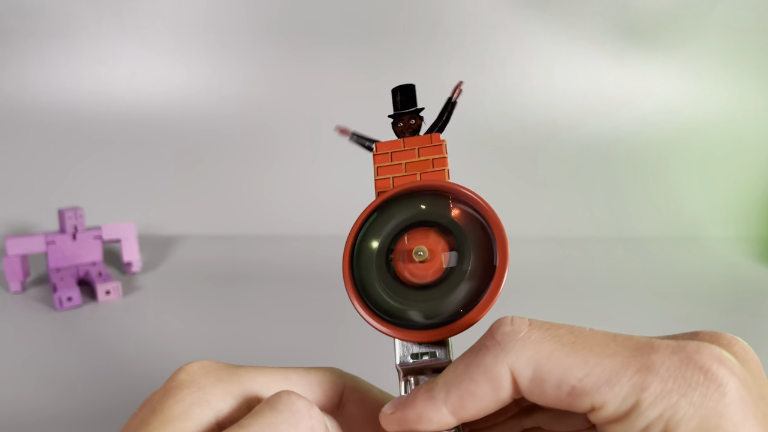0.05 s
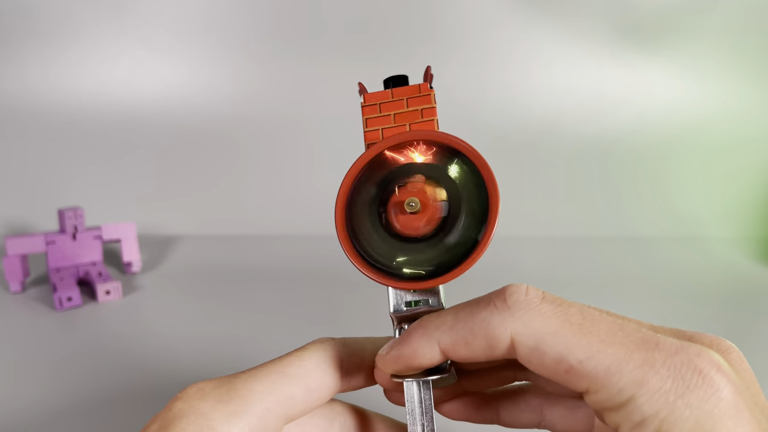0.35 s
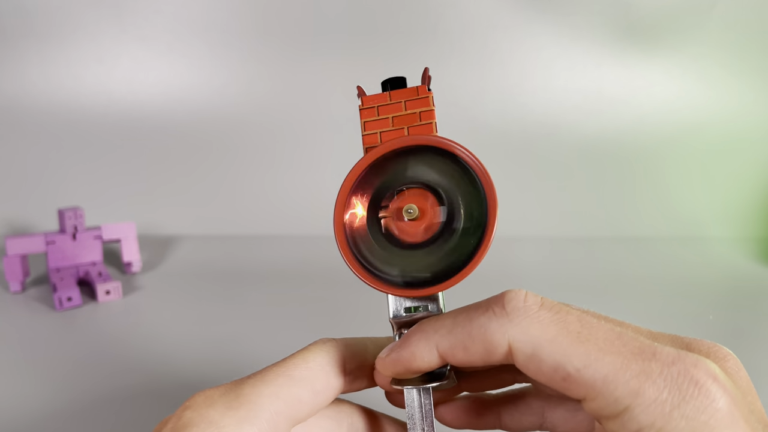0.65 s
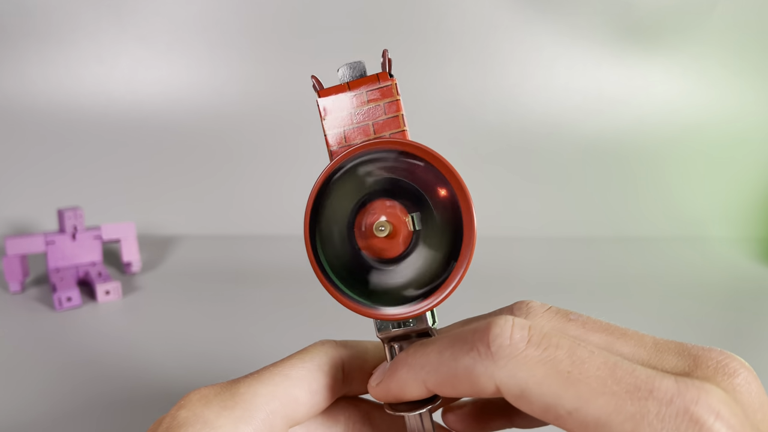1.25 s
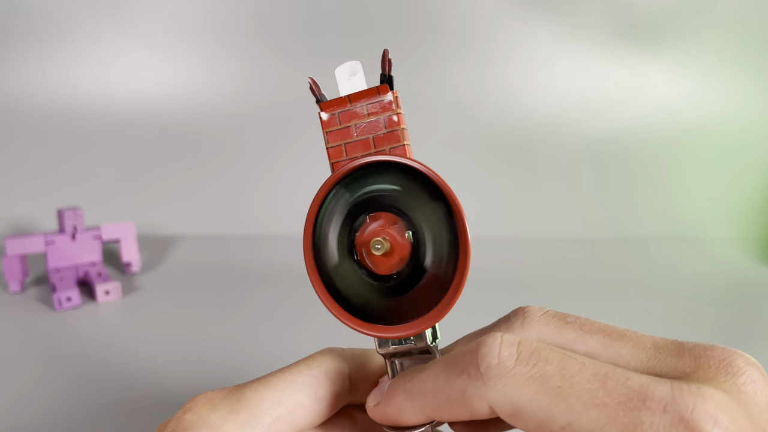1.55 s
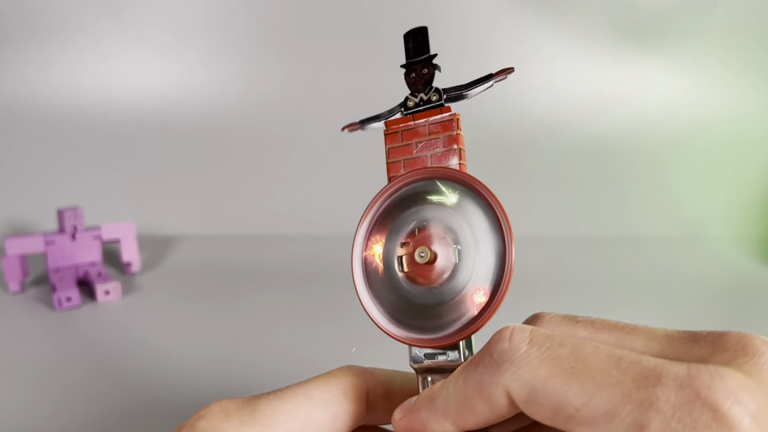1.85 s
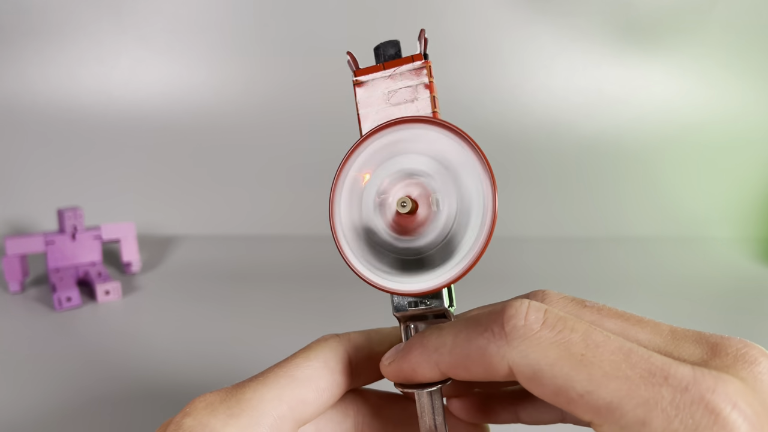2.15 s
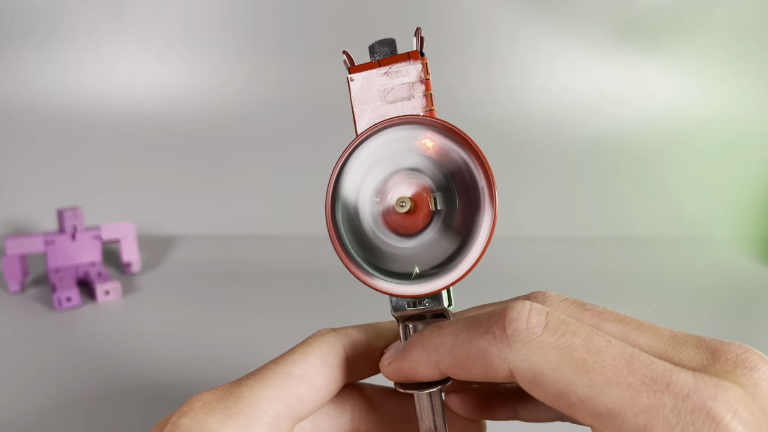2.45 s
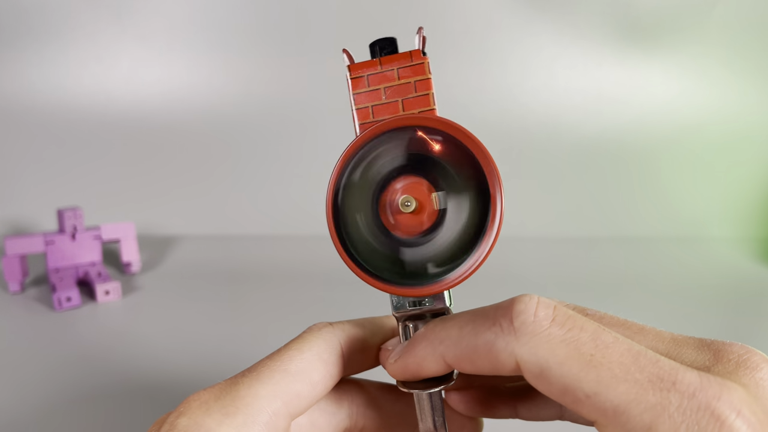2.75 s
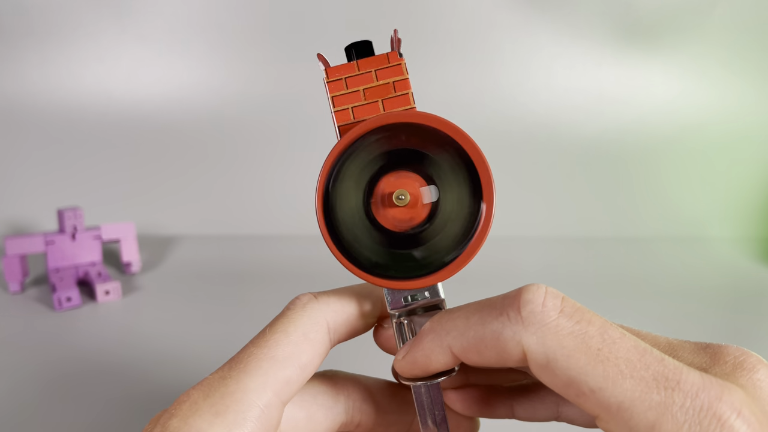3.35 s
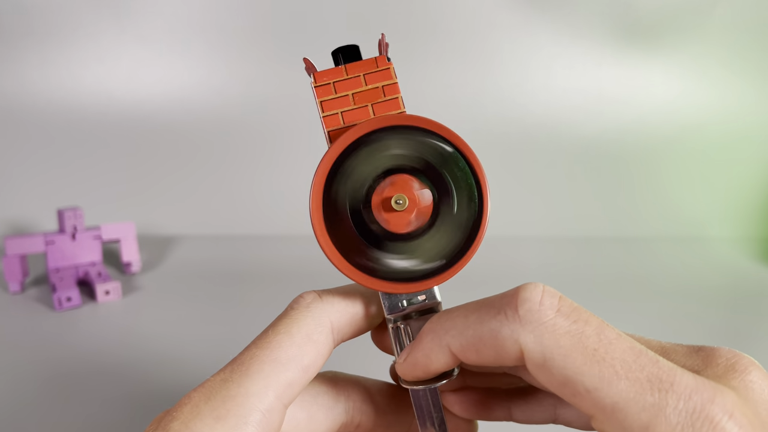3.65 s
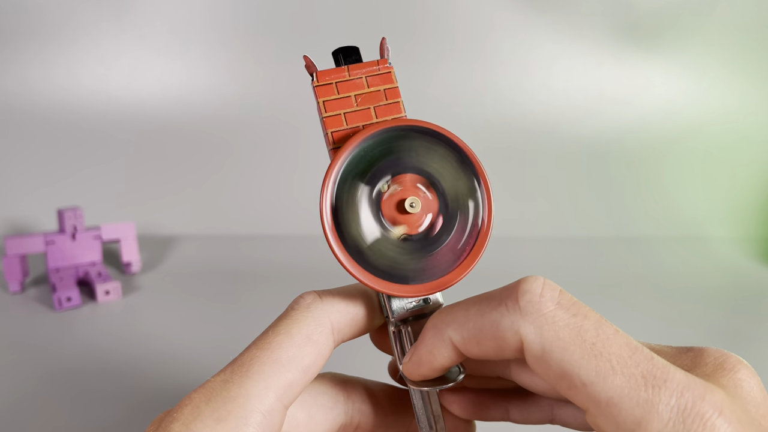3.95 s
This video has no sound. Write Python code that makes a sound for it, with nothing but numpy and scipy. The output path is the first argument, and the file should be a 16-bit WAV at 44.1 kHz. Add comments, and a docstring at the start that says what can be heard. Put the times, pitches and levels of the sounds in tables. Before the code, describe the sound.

Scratchy metallic chatter of a spinning spark wheel toy, pushed twice and left to coast.

```python
"""A tin spark-wheel toy

The toy, close to the microphones, is pumped twice and coasts down after each push.
Its loose gear teeth chatter ever slower, a flint grinds on the gritty wheel, and both ring the tin shell.
Each push adds a low rasp, a brief axle squeal and a faint rumble of the hand; the room is quiet."""
import sys
import numpy as np
from scipy import signal
from scipy.fft import rfft, irfft, next_fast_len
from scipy.io import wavfile
from scipy.ndimage import uniform_filter1d, map_coordinates

SR = 44100
rng = np.random.default_rng(int(sys.argv[2]) if len(sys.argv) > 2 else 0)


def unload_audio(sound):
    """Save the sound as a 16-bit wav file, at the path given as the first command line argument."""
    columns = np.transpose(np.atleast_2d(sound))
    # keep every value between -1 and 1, then stretch to whole-number steps
    steps = np.round(np.clip(columns, -1, 1) * 32767)
    wavfile.write(sys.argv[1], SR, steps.astype(np.int16))


N = 176400
TIME = np.arange(N) / SR
CRUISE_HZ = 100  # teeth per second while the wheel coasts

# teeth that catch hard and stand out of the chatter (time [s], relative level [dB])
CATCHES = [(0.0268, -12.5), (0.0414, -16), (0.1204, -10), (0.2606, -10.5), (0.2842, -15.5), (0.3578, -17),
           (0.4275, -17), (0.4632, -15.5), (0.5788, -15), (0.6115, -15.5), (0.6378, -17.5), (0.7245, -18.5),
           (0.7567, -17.5), (0.7859, -23), (0.8856, -21), (0.898, -18.5), (0.9305, -18.5), (0.9508, -18),
           (0.9851, -23), (1.005, -16.5), (1.0336, -20), (1.0584, -17.0), (1.0732, -18), (1.1336, -19),
           (1.1485, -19.0), (1.174, -24), (1.2055, -23.5), (1.2224, -22.5), (1.2345, -21), (1.2649, -20.5),
           (1.2904, -20.5), (1.3116, -22.0), (1.3396, -19.5), (1.356, -20), (1.3662, -19), (1.3865, -18.5),
           (1.4794, -15.5), (1.4981, -18.5), (1.5724, -18.5), (1.5818, -20), (1.5947, -17.5),
           (1.6399, -11.5), (1.6657, -12.5), (1.7263, -9.5), (1.8195, -9.5), (2.1787, -20), (2.2815, -17),
           (2.3174, -16.5), (2.3445, -19), (2.411, -18), (2.5354, -20.5), (2.5641, -18.5), (2.6521, -21),
           (2.6594, -20), (2.7977, -19.5), (2.808, -16.5), (2.8608, -25), (2.8712, -19), (2.9299, -21.5),
           (2.964, -20), (3.0576, -22), (3.109, -23), (3.1895, -19.5), (3.2285, -21), (3.3687, -20.0),
           (3.4345, -26), (3.501, -23.5), (3.5203, -28.5), (3.5339, -26), (3.5518, -25.5), (3.5778, -24.0),
           (3.5994, -26), (3.6141, -25), (3.632, -22.5), (3.6534, -21.0), (3.7347, -23.5), (3.766, -25.5),
           (3.8501, -26), (3.8891, -30), (3.9058, -28.5), (3.9378, -27.5), (3.9789, -19)]


def toy():
    """Teeth and flint strike the metal as the wheel speeds up and slows down."""
    # how fast the wheel turns (time [s], speed [teeth per second])
    wheel_speed = [(0, 202), (.12, 233), (.25, 129), (.55, 101), (.85, 104), (1.25, 76), (1.5, 72.6),
                   (1.62, 128), (1.78, 233), (2.0, 138), (2.45, 114.5), (2.85, 92.5), (3.5, 77.7), (4, 51)]
    # how loud the toy is (time [s], relative treble level [dB], relative middle level [dB])
    loudness = [(0, -20.5, -28), (.1, -21, -28.5), (.16, -27, -33.5), (.26, -24, -31), (.38, -28.5, -35),
                (.68, -26.5, -34), (.98, -30, -37), (1.22, -31.5, -38.5), (1.37, -30.5, -37),
                (1.58, -29.5, -38), (1.67, -24.5, -30.5), (1.81, -19.5, -30), (1.9, -25.5, -35),
                (2.2, -28, -34), (2.52, -32.5, -38), (2.65, -31, -35.5), (3.12, -35, -39), (3.25, -29, -36),
                (3.32, -36, -38), (3.48, -37.5, -42), (3.67, -35.5, -38), (3.93, -36.5, -42)]
    speed, = curves(wheel_speed)
    treble_db, middle_db = curves(loudness)
    grit = amp(-7 + 3.5 * np.log2(speed / CRUISE_HZ)) ** 2  # more flint at higher speed
    contact = (teeth(speed) + grit * flint(speed)) / (1 + grit)
    contact = 16 * np.tanh(contact / 16)  # softly limit the ordinary hits
    contact += catches(speed, treble_db)
    slow = smooth(contact, seconds=.0048)  # the shell's low notes answer slowly
    return (clicks(contact, treble_db, middle_db) + ringing(contact, slow, middle_db)
            + scraping(slow, middle_db) + pushes(slow))


def teeth(speed):
    """Each passing tooth hits and bounces once; a gap is left where a tooth catches."""
    passed = np.cumsum(speed) / SR
    count = int(passed[-1])
    jitter, strength, delay, bounce = rng.standard_normal((1000, 4))[:count].T
    place = np.arange(count) + .5 + .055 * jitter  # counted in teeth
    caught = np.interp(np.transpose(CATCHES)[0], TIME, passed)
    free = np.abs(place[:, None] - caught).min(axis=1) > .65
    times = np.interp(place, passed, TIME)
    db = 1.8 * strength
    length = drag_time(times, speed)
    bounce_times = times + 2 * length * np.exp(delay / np.pi)
    bounce_db = db - 5 + 2 * bounce

    def strike(which):
        hit = bursts(times[which], db[which], length[which])
        return hit + bursts(bounce_times[which], bounce_db[which], length[which] / 2)

    passing = strike(free)
    return passing / running_mean(passing + strike(~free))


def catches(speed, chatter_db):
    """Some teeth catch hard: short bursts of energy above the chatter."""
    times, db = np.transpose(CATCHES)
    over_db = db - 2.7 - np.interp(times, TIME, chatter_db)
    return bursts(times, over_db, .85 * drag_time(times, speed))


def drag_time(times, speed):
    """Seconds of contact: a tooth drags on the slow wheel and snaps past on the fast one."""
    return .001 * (CRUISE_HZ / np.interp(times, TIME, speed)) ** .9


def flint(speed, grains_per_s=1400):
    """Grit passes under the flint, denser as the wheel speeds up."""
    chance, strength = rng.random(N), rng.standard_normal(N)
    at = np.flatnonzero(chance < grains_per_s * speed / CRUISE_HZ / SR)
    energy = bursts(at / SR, 5 * strength[at], length_s=.0001, size=60)
    return energy / running_mean(energy)


def clicks(contact, treble_db, middle_db):
    """Each hit makes a bright edge, a short ping of the wheel and a fuller body."""
    # tone of the bright edge (frequency [Hz], level [dB])
    edge_tone = [(3000, -60), (6000, -26), (8000, -11), (8550, -8), (9400, -3), (10100, -1.5), (11200, 0),
                 (12200, -3), (12750, -2.5), (13200, -15), (14000, -26), (14600, -32), (15400, -29),
                 (16000, -40)]
    # the wheel's own notes (frequency [Hz], width [Hz], level [dB])
    ping_notes = [(8930, 240, 0), (11130, 300, -10)]
    # tone of the body (frequency [Hz], level [dB])
    body_tone = [(100, -53), (480, -64), (680, -28), (1050, -39), (1600, -49), (2400, -6.5), (3500, -32.5),
                 (4400, -1.5), (5600, 5), (6400, 4.5), (7800, 4.5), (9500, 5.5), (13000, -33)]
    edge = noise(contact * shifting(3.5) * amp(treble_db + 2) ** 2, edge_tone)
    ping = noise(contact * shifting(3) * amp(treble_db - 4) ** 2, modes(ping_notes))
    body = noise(contact * shifting(4) * amp(middle_db - 1.5) ** 2, body_tone)
    return edge + ping + body


def ringing(contact, slow, middle_db):
    """The hits ring the tin shell, the wheel's rim and the housing."""
    # high notes of the shell (frequency [Hz], width [Hz], level [dB])
    shell_notes = [(4104, 70, -11), (4641, 45, -6), (5019, 36, 7), (5158, 45, 1.5), (5312, 30, -4),
                   (7578, 80, -2), (8262, 80, -2.5), (12676, 50, 1)]
    # bright note of the rim (frequency [Hz], width [Hz], level [dB])
    rim_notes = [(6915, 90, 0)]
    # low notes of the housing (frequency [Hz], width [Hz], level [dB])
    housing_notes = [(720, 54, -9.5), (1281, 10, -11.5), (1660, 124, -18), (2250, 55, -6), (2959, 36, 7)]
    damped_db = .86 * (middle_db + 37)  # pressure damps the metal, so it gains less than the hits do
    shell = noise(contact * amp(middle_db) ** 2, modes(shell_notes))
    rim = noise(contact * shifting(4) * amp(damped_db - 39) ** 2, modes(rim_notes))
    # so small a toy gives off little below 700 Hz
    housing_tone = lambda hz: modes(housing_notes)(hz) * hz ** 6 / (hz ** 6 + 700 ** 6)
    housing = noise(slow * amp(damped_db - 49.3) ** 2, housing_tone)
    return shell + rim + housing


def shifting(depth_db, changes_per_s=130):
    """A wavering energy factor: each point of contact favours other notes."""
    points = np.tanh(rng.standard_normal(2000))
    gain = amp(depth_db * map_coordinates(points, [TIME * changes_per_s])) ** 2
    return gain / gain.mean()


def scraping(slow, middle_db):
    """The hits blur into a softer scrape."""
    # tone of the scrape (frequency [Hz], level [dB])
    scrape_tone = [(100, -68), (500, -51), (680, -20), (1050, -19.5), (1600, -10.5), (2300, -5),
                   (2650, 7.5), (3500, -14), (4300, 11.5), (6000, 14), (9000, -19)]
    return noise(slow * amp(middle_db - 7.5) ** 2, scrape_tone)


def pushes(slow):
    """Under the load of a push, the gears rasp and whirr."""
    # weight of the pushes (time [s], relative rasp level [dB], relative whirr level [dB])
    push_levels = [(0, -65, -63), (.1, -66, -65), (.18, -75.5, -75), (.28, -71, -66.5), (.4, -91, -66),
                   (.55, -97, -67.5), (.9, -96, -93), (1.55, -99, -101), (1.64, -79, -67),
                   (1.78, -71.5, -57.5), (1.95, -77, -68), (2.15, -76, -72), (2.32, -91, -70.5),
                   (2.5, -87, -70.5), (2.75, -101, -77), (3.5, -91, -98), (3.85, -110, -99), (4, -91, -88)]
    # tone of the rasp (frequency [Hz], level [dB])
    rasp_tone = [(40, -34), (140, -4), (300, 2.5), (600, 3), (1100, 0), (1900, 11.5), (2700, -1),
                 (3500, 17.5), (6000, -46)]
    # tone of the whirr (frequency [Hz], level [dB])
    whirr_tone = [(200, -24), (380, -9.5), (520, -0.5), (800, 3), (1100, -9.5), (1700, 11), (3000, 2),
                  (6000, -59)]
    rasp_db, whirr_db = curves(push_levels)
    rasp = noise(slow * amp(rasp_db + 20.5) ** 2, rasp_tone)
    whirr = noise(slow * amp(whirr_db + 8) ** 2, whirr_tone)
    return rasp + whirr


def axle(pitch_hz=4595, width_hz=240):
    """The dry axle gives a brief, rough squeal as each push ends."""
    # the squeals (middle time [s], half length [s], level [dB])
    squeals = [(0.222, 0.042, -34.5), (2.003, 0.072, -35.5)]
    energy = sum(amp(db) ** 2 * np.exp(-((TIME - middle) / half) ** 2) for middle, half, db in squeals)
    return noise(energy, lambda hz: modes([(pitch_hz, width_hz, 0)])(hz) ** 2)


def hand():
    """The hand working the plunger makes a dull rumble."""
    # strength of the rumble (time [s], relative level [dB])
    rumble_levels = [(0, -66.5), (.2, -74), (.33, -89), (.7, -105), (1.5, -96), (1.68, -82), (1.9, -73.5),
                     (2.12, -89), (2.8, -104)]
    # tone of the rumble (frequency [Hz], level [dB])
    rumble_tone = [(20, -20), (45, -14), (68, -7), (110, -11), (170, -22), (400, -78)]
    rumble_db, = curves(rumble_levels)
    return noise(amp(rumble_db + 3.5) ** 2, rumble_tone)


def room():
    """The room hisses faintly and steadily."""
    # tone of the hiss (frequency [Hz], level [dB])
    hiss_tone = [(20, -2), (100, 0.5), (400, -9), (2000, 2.5), (15000, -16)]
    return noise(amp(-77) ** 2, hiss_tone)


def noise(energy, tone):
    """Stereo noise that follows an energy curve; its tone is a table or a function of frequency."""
    # how alike the two microphones sound (frequency [Hz], likeness [0-1])
    likeness = [(60, .85), (200, .72), (500, .75), (1200, .64), (3000, .75), (4300, .65), (5000, .8),
                (6000, .58), (6900, .8), (7300, .55), (8000, .75), (9000, .95), (12500, .95), (14000, .85)]
    # how much louder the left one is (frequency [Hz], level [dB])
    balance = [(100, 0), (250, 1), (700, 4), (3000, 3.3), (5200, 4.5), (6400, 0), (7400, 3), (8400, 0),
               (13000, 0)]
    # how far ahead the left one is (frequency [Hz], phase [radians])
    left_lead = [(100, 0), (400, .05), (1500, .25), (1900, .7), (2150, 2.3), (3600, 3), (4300, 3.7),
                 (5350, 3.9), (6300, 6.3), (6950, 5.4), (7450, 6.9), (8600, 5.5), (9400, 4.2),
                 (10200, 3.14), (11100, 1.3), (11900, 0), (12700, -1.3), (13300, -2.9), (14500, -3.3)]
    size = 2 * next_fast_len(N // 2 + 8192)
    hz = np.fft.rfftfreq(size, 1 / SR)
    response = tone(hz) if callable(tone) else tone_filter(tone, hz)
    response /= np.sqrt(np.mean(np.abs(response) ** 2))
    hiss = np.sqrt(np.abs(energy)) * rng.standard_normal((2, N))
    mid, side = rfft(hiss, size) * response
    spread = np.arccos(np.clip(along(likeness, hz), 0, 1)) / 2
    mid, side = mid * np.cos(spread), side * np.sin(spread)
    pan = amp(along(balance, hz) / 2) * np.exp(.5j * along(left_lead, hz))
    return irfft(np.array([(mid + side) * pan, (mid - side) / pan]), size)[:, :N]


def bursts(times, db, length_s, size=600):
    """Energy of hits that rise, fall and leave a short after-ring in the shell."""
    step = np.arange(size)
    age = step / (np.reshape(length_s, (-1, 1)) * SR)
    shape = (1 - np.exp(-age)) ** 2 * np.exp(-age)
    shape = shape / shape.max(axis=1, keepdims=True) * amp(db)[:, None] ** 2
    at = np.clip(times * SR, 0, N).astype(int)[:, None] + step
    energy = np.bincount(at.ravel(), shape.ravel(), N + size)[:N]
    return energy + amp(-13) ** 2 * smooth(energy, seconds=.008)


def modes(notes):
    """A filter made of the notes (modes) at which an object rings."""
    return lambda hz: sum(amp(db) * 1j * hz * width / (pitch ** 2 - hz ** 2 + 1j * hz * width)
                          for pitch, width, db in notes)


def tone_filter(points, hz):
    """A filter with the given tone that never sounds ahead of the hit."""
    cepstrum = irfft(np.log(amp(along(points, hz))))
    half = len(cepstrum) // 2
    return np.exp(rfft(np.concatenate([cepstrum[:1], 2 * cepstrum[1:half], np.zeros(half)])))


def smooth(energy, seconds):
    """Spread energy into a fading tail."""
    keep = np.exp(-1 / (seconds * SR))
    return signal.lfilter([1 - keep], [1, -keep], energy)


def running_mean(energy):
    """The average over several teeth."""
    return np.abs(uniform_filter1d(uniform_filter1d(energy, size=2600), size=2600)) + 1e-9


def curves(rows):
    """One value per sample for each column after the time."""
    times, *columns = np.transpose(rows)
    return [np.interp(TIME, times, column) for column in columns]


def along(points, hz):
    """Join (frequency, value) points on a log frequency axis."""
    frequencies, values = np.transpose(points)
    return np.interp(np.log(hz + 1), np.log(frequencies + 1), values)


def amp(db):
    """Decibels to gain; square it for energy."""
    return 10 ** (np.asarray(db) / 20)


def scene():
    """The toy over the room's faint hiss."""
    return toy() + axle() + hand() + room()


def record(dry, dip_hz=10440, dip_width_hz=210, ceiling=.85, top_hz=15950):
    """The microphones leave a narrow dip in the treble; peaks are rounded and the very top is cut."""
    size = next_fast_len(N + SR // 2)
    hz = np.fft.rfftfreq(size, 1 / SR)
    dip = 1 - .95 * modes([(dip_hz, dip_width_hz, 0)])(hz)
    heard = irfft(rfft(dry, size) * dip, size)
    rounded = heard / (1 + np.abs(heard / ceiling) ** 10) ** (1 / 10)
    return irfft(rfft(rounded) * (hz < top_hz), size)[:, :N]


dry = scene()
out = record(dry)
unload_audio(out)
```